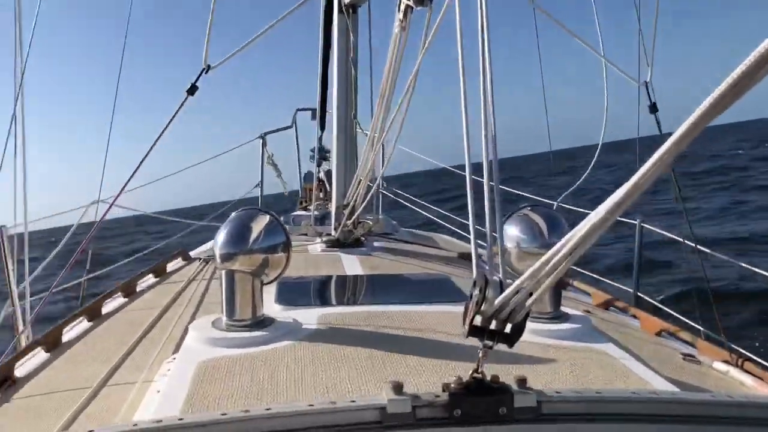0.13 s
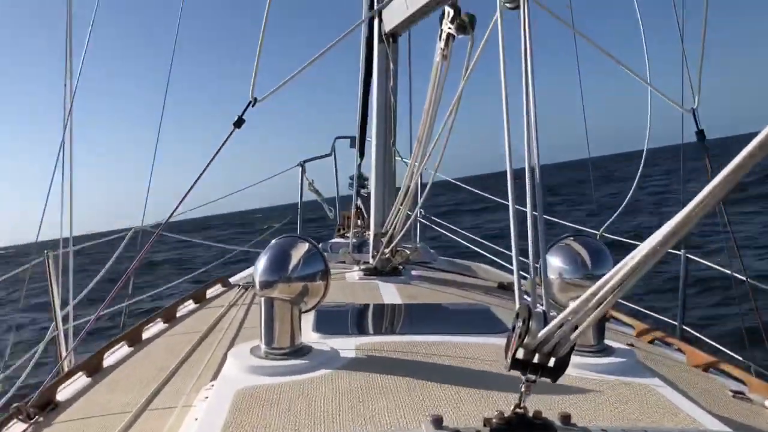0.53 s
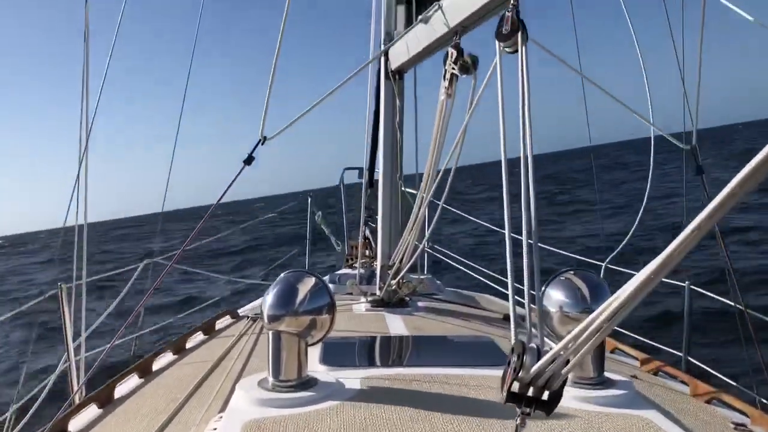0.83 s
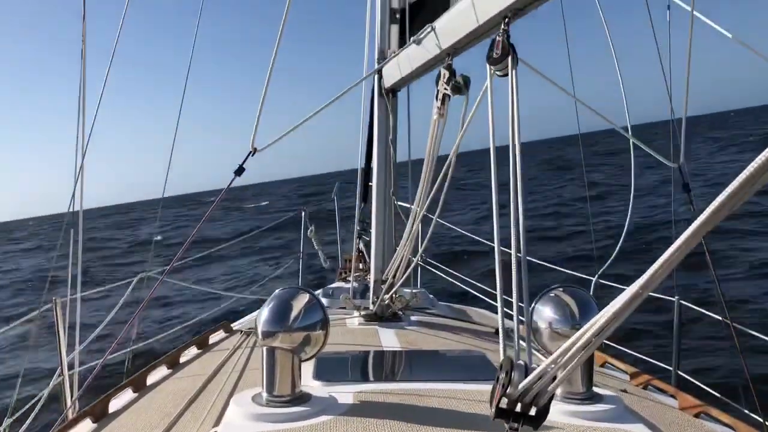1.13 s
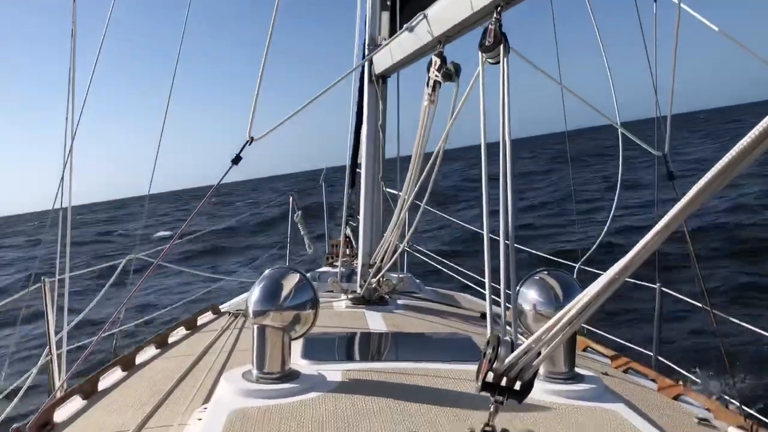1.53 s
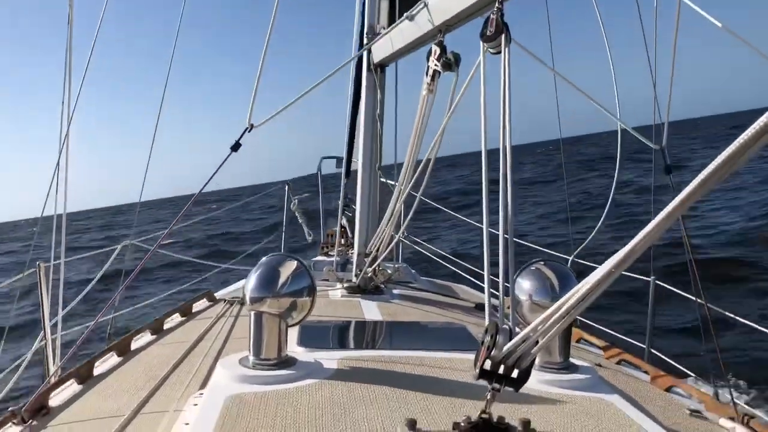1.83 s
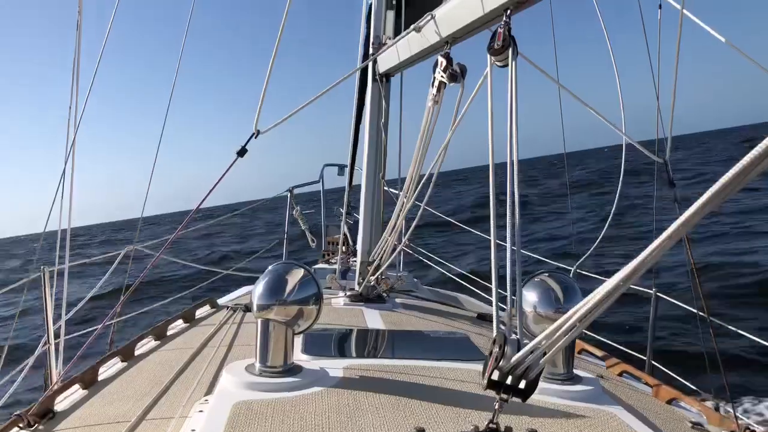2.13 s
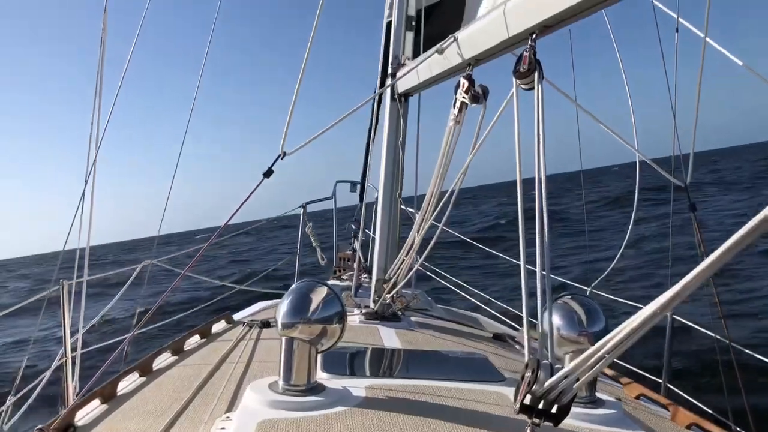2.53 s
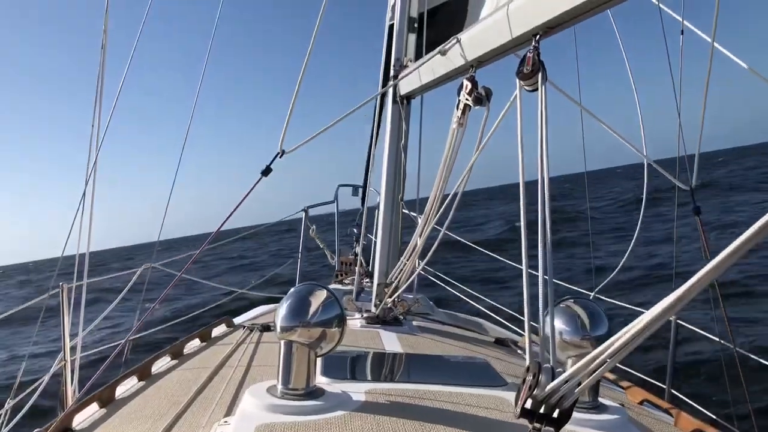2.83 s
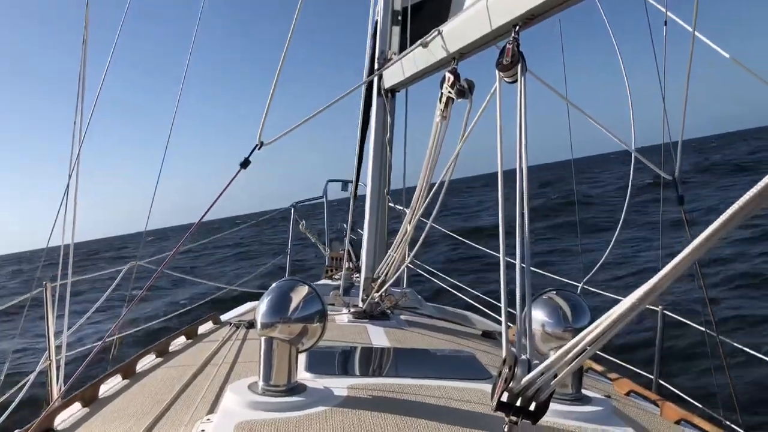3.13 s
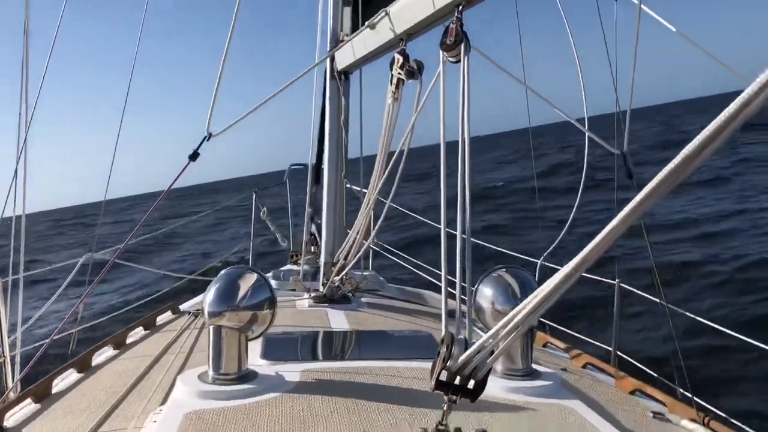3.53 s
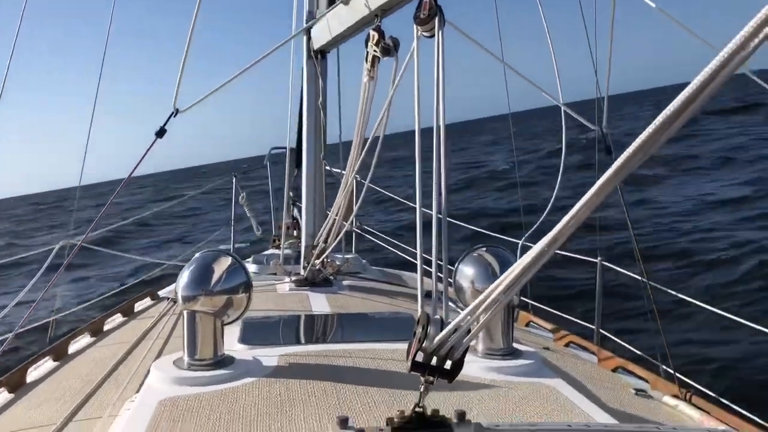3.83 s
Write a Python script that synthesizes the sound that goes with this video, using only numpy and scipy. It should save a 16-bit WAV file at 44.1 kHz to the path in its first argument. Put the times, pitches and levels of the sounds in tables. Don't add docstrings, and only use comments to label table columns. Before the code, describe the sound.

Wind on an exposed microphone aboard a sailboat: a low, uneven rumble for the first 2.7 seconds. Beneath it, water hisses faintly along the hull with soft slaps; spray fizzes around 0.3 and 0.6 seconds with tiny drop ticks. A block knocks lightly near 1.85. At 2.7 a gust hits, booming, then from 3.2 turning brighter, crackling and popping, squashed at full loudness until the abrupt end at 4.

```python
import sys
import numpy as np
from scipy import signal
from scipy.fft import rfft, irfft
from scipy.io import wavfile
from scipy.ndimage import uniform_filter1d, minimum_filter1d

SR = 44100
rng = np.random.default_rng(int(sys.argv[2]) if len(sys.argv) > 2 else 0)


def gain_from_decibels(decibels):
    exponent = np.asarray(decibels, float) / 20
    return 10 ** exponent


def pcm_store(signal):
    levels = np.round(np.clip(np.atleast_2d(signal), -1, 1) * 32767)
    wavfile.write(sys.argv[1], SR, levels.astype(np.int16).T)


N = 176400

# (time [s], strength [dB], swirl reach [octaves above REACH_HZ])
WIND_COURSE = [(0.0, -31, 0.15), (0.99, -27, 0.22), (1.21, -33, 0.56), (1.24, -28, 0.13), (1.8, -32, 0.22),
               (1.84, -24, 0.45), (2.14, -25, 0.17), (2.24, -29, 0.33), (2.72, -26.5, 0.17),
               (2.74, -14.5, 0.19), (2.99, -21, 0.17), (3.03, -12.5, 0.27), (3.15, -13.5, 0.69),
               (3.17, -18.5, 0.94), (3.31, -12, 1), (3.61, -14, 0.75), (3.64, -17.5, 0.96),
               (4.0, -13, 0.89)]
# (centre [s], strength [dB], half length [s])
EDDY_BURSTS = [(2.755, -33, 0.0054), (2.826, -32.5, 0.0045), (2.889, -34, 0.018), (2.998, -32, 0.0073),
               (3.022, -38, 0.0043), (3.03, -34, 0.0047), (3.065, -21.5, 0.0034), (3.097, -42, 0.0021),
               (3.214, -13, 0.0022), (3.262, -19, 0.0042), (3.287, -25, 0.0086), (3.318, -17.5, 0.014),
               (3.351, -23, 0.0017), (3.377, -14, 0.0048), (3.395, -39, 0.0077), (3.408, -13.5, 0.011),
               (3.432, 0, 0.0014), (3.447, -4, 0.0073), (3.461, -9.5, 0.018), (3.425, -10.5, 0.0023),
               (3.477, -10, .002), (3.668, -20, 0.0065), (3.279, -26, 0.0034), (3.478, -24, 0.0057),
               (3.493, -13, 0.014), (3.55, -9.5, 0.014), (3.58, -5.5, 0.015), (3.606, -14.5, 0.0057),
               (3.657, -20.5, 0.033), (3.787, -11.5, 0.012), (3.821, -15.5, 0.009), (3.878, -9.5, 0.0054),
               (3.888, -14.5, 0.034), (3.955, -20.5, 0.0045), (3.974, -13.5, 0.0099)]
# (centre [s], change [dB], half length [s])
RUMBLE_HEAVES = [(.29, 5, 0.014), (0.392, 6.5, 0.014), (1.1, -1.5, 0.028), (1.295, -5.5, 0.013),
                 (1.34, 3, 0.024), (1.583, 2, 0.022), (2.054, 3.5, 0.023), (2.43, -3.5, 0.011),
                 (2.463, 3.5, 0.027), (3.576, -1, .015), (3.313, -4, .012), (3.135, 2.5, 0.014),
                 (3.49, 0, .015), (2.8, -4.5, 0.018), (2.896, 1.5, 0.015), (3.385, -1.5, 0.0047),
                 (3.455, -1, 0.019), (3.75, -3.5, 0.024), (3.794, 1, 0.015), (3.896, -5, .03),
                 (3.94, 0.5, 0.017)]
# (time [s], hiss level [dB], extra body [dB])
SEA_COURSE = [(0.0, -63, 0.5), (0.17, -66.5, -0.5), (0.29, -58, -5), (0.47, -59, -4.5), (0.61, -60.5, -4),
              (0.67, -61, 3), (1.15, -59, 2.3), (1.26, -54.5, -1.5), (1.88, -64, 3.5), (2.64, -65.5, 1.9),
              (2.718, -66, 2), (2.726, -63, 3), (2.97, -59, -5), (3.05, -60.5, 4), (3.31, -61, 2),
              (3.35, -58, 6.5), (3.98, -57, 6.5), (4.0, -56, 12)]
# (frequency [Hz], density [dB per Hz])
FOAM_SPECTRUM = [(500, 4.5), (1500, 1), (3000, -4.5), (5400, -9), (8000, -12.5), (11500, -17.5),
                 (15500, -25.5)]
# (frequency [Hz], density [dB per Hz])
RUSH_SPECTRUM = [(200, -12), (500, 1.5), (900, 6), (1500, -4), (3000, -35), (6000, -64)]
# (frequency [Hz], density [dB per Hz])
RIGGING_SPECTRUM = [(2000, 12), (5000, -19), (10000, -16), (15500, 1)]
# (centre [s], level [dB], pitch [Hz], half length [s])
HULL_SLAPS = [(.057, -39, 830, 0.014), (.187, -39, 740, 0.019), (1.862, -44, 1600, 0.0054),
              (2.008, -44, 1200, 0.013), (2.028, -37, 450, 0.019), (2, -50, 2400, .003),
              (.83, -43.5, 920, 0.046), (.592, -42, 2600, 0.003), (3.03, -17, 220, 0.011),
              (2.46, -28, 135, 0.028), (1.345, -41, 320, .04), (3.99, -15, 380, 0.0071)]
# (centre [s], half length [s], level [dB])
SPRAY_SHEETS = [
    (0.293, 0.073, -45.5),
    (0.592, 0.051, -51.5),
    (0.368, 0.042, -49.5),
    (0.303, .015, -50.5),
    (.46, .04, -61),
    (3.955, 0.03, -52),
    (3.1, .012, -53),
    (0.61, 0.0074, -54),
    (.71, 0.0093, -66),
    (3.9, .012, -56),
]
# (frequency [Hz], density [dB per Hz])
FIZZ_SPECTRUM = [(880, -20), (1500, -12), (2420, 0), (3120, -4.5), (6250, -8), (6890, -11), (15500, -13.5)]
# (time [s], level [dB], pitch [Hz])
DECK_DROPS = [(0.1331, -36, 7070), (0.2329, -33, 7490), (0.5043, -34, 8380), (0.5424, -40, 12000),
              (0.5675, -35, 11000), (0.606, -31, 8500), (0.6305, -33, 6160), (0.673, -35, 5720),
              (1.3894, -44, 13000), (1.713, -44, 12000), (1.8594, -46, 9000), (0.2081, -42, 6350),
              (0.2615, -40, 5000), (0.3545, -32, 9000), (0.584, -42, 11000), (2.1834, -40, 9600),
              (3.395, -33, 8000)]
# (frequency [Hz], level [dB], t60 [s])
DECK_MODES = [(620, 1, 0.018), (950, 1, 0.036), (1300, -2, 0.018), (1630, -1, 0.018), (2130, -4.5, 0.027),
              (2670, -11, .014)]
# (time [s], peak [dB], pitch [Hz])
PRESSURE_POPS = [(2.756, -26, 420), (2.819, -28, 450), (2.826, -17.5, 397), (2.866, -26, 500),
                 (2.996, -14.5, 407), (3.018, -18.5, 650), (3.029, -7.5, 377), (3.065, -10.5, 650),
                 (3.102, -13, 706), (3.212, -15.5, 950), (3.255, -19, 810), (3.269, -14, 750),
                 (3.292, -13, 800), (3.329, -6.5, 800), (3.378, -2.5, 920), (3.399, -8.5, 890),
                 (3.419, -11, 1540), (3.432, -2, 1510), (3.475, -14, 1250), (3.5, -8.5, 1020),
                 (3.549, -5, 900), (3.578, -8.5, 1880), (3.62, -8, 600), (3.784, -8, 800),
                 (3.792, -14, 690), (3.821, -9, 500), (3.883, -12.5, 1220), (3.897, -4, 696),
                 (3.9726, -13, 1100), (3.981, -8, 1230), (3.281, -14, 806), (3.4235, -12.5, 1900),
                 (3.315, -12, 900), (3.322, -13.5, 1100), (3.375, -14, 1380), (3.444, -8, 1300),
                 (3.448, -14, 1400), (3.459, -11, 1200), (3.57, 0, 1200), (3.582, -9, 1500),
                 (3.717, -18.5, 694), (3.751, -17, 690), (3.909, -16, 990), (3.966, -11, 700),
                 (3.975, -12, 800), (3.99, -24, 500), (2.728, -31, 450), (2.892, -15.5, 546),
                 (3.229, -16, 600), (3.366, -12, 800), (3.4974, -15, 1500), (3.524, -19, 1000),
                 (3.852, -12, 600), (3.954, -17, 900), (3.8834, -24, 2200), (3.4745, -27, 1900)]

REACH_HZ, FALL_DB, FALL_POWER, TILT_DB_PER_OCT = 176.7, 9, 1.324, 0.16
EDDY_QUIET_DB, EDDY_DB_PER_OCT, EDDY_PUSH_DB = -47.5, 17.5, 5.5
LUMP_DB, LUMP_OCT, LUMP_HZ, BAND_WOBBLE_DB = 2.0, 0.073, 60, 1.8
SURGE_DB, SURGE_HZ = 0.82, 3.8
CRACKLE_OCT, CRACKLE_HZ = 0.048, 160
THIN_DB_PER_OCT = 4
STEADINESS, CAPSULE_TOP_HZ = 0.075, 2570
LOW_CUT_HZ, RUMBLE_CUT_HZ, EDGE_HZ = 53, 33, 15720
FOAM_DB, RUSH_DB, RIGGING_DB = 13, 13, -63
GUST_ONSET_S, GUST_HISS_DB = 2.723, 2
SLAP_WIDTH_OCT = 0.84
DROP_WIDTH_OCT, DROP_RISE_S, DROP_DB = 0.8, 0.0006, -3.5
KNOCK_S, KNOCK_DB, REBOUND_S, REBOUND_DB = 1.8424, -32, 0.00264, 8.5
POP_OCTAVE_BELOW, POP_HALF_CYCLES = 0.72, 0.72
CEILING = 0.92


def evened(x):
    return x / np.sqrt(np.mean(x ** 2) + 1e-20)


def read(points, hz):
    f, value = np.transpose(points)
    return np.interp(np.log(hz + 1), np.log(f + 1), value)


def course(table, t):
    at, first, second = np.transpose(table)
    return np.interp(t, at, first), np.interp(t, at, second)


def bell(t, at, half_s):
    return np.exp(-0.5 * ((t - at) / half_s) ** 2)


def drift(top_hz, count=1):
    hz = np.fft.rfftfreq(N, 1 / SR)
    z = rfft(rng.standard_normal((count, N))) * (hz > 2) / (1 + (hz / top_hz) ** 2)
    return evened(irfft(z, N))


def pitched_noise(count, pitch_hz, width_oct):
    octaves = np.log2((np.fft.rfftfreq(count, 1 / SR) + 1) / pitch_hz)
    return evened(irfft(rfft(rng.standard_normal(count)) * np.exp(-(octaves / width_oct) ** 2)))


def patchy(spectrum, patchy_db, flicker_db):
    frames, hz = N // 128 + 5, np.fft.rfftfreq(512, 1 / SR)
    a, b, patches = rng.standard_normal((frames, 257, 3)).T
    patches = uniform_filter1d(patches, size=9, axis=0)
    patches = evened(uniform_filter1d(patches, size=16, axis=1))
    flicker = evened(uniform_filter1d(rng.standard_normal(frames), size=5))
    lows = np.minimum(hz / spectrum[0][0], 1) ** 2
    level_db = read(spectrum, hz)[:, None] + patchy_db * patches + flicker_db * flicker
    z = (a + 1j * b) * lows[:, None] * gain_from_decibels(level_db)
    return evened(signal.istft(z, nperseg=512, noverlap=384)[1][:N])


def wind():
    t, hz = np.arange(N) / SR, np.fft.rfftfreq(N, 1 / SR)
    level_db, reach_oct = course(WIND_COURSE, t)
    burst = np.zeros(N)
    for at, db, half_s in EDDY_BURSTS:
        peak = 2 ** ((db - EDDY_QUIET_DB) / EDDY_DB_PER_OCT)
        burst += (peak * bell(t, at, half_s)) ** 4
    lumps = drift(LUMP_HZ, count=2)
    reach_hz = REACH_HZ * (16 ** reach_oct + burst) ** (1 / 4) * 2 ** (LUMP_OCT * lumps[0])
    level_db = level_db + LUMP_DB * (lumps[0] + lumps[1]) / 2
    level_db += EDDY_PUSH_DB * np.log2(1 + burst / 16 ** reach_oct) / 4
    level_db += SURGE_DB * drift(SURGE_HZ)[0]
    for at, db, half_s in RUMBLE_HEAVES:
        level_db += db * bell(t, at, half_s)
    reach_hz = reach_hz * (reach_hz / REACH_HZ) ** (CRACKLE_OCT * drift(CRACKLE_HZ)[0])

    centres_hz = 30 * np.sqrt(2) ** np.arange(16)
    wobbles = drift(LUMP_HZ / 2, count=16)
    noise = rfft(rng.standard_normal(N))
    out = np.zeros(N)
    for c, wobble in zip(centres_hz, wobbles):
        band = np.cos(np.pi / 2 * np.clip(2 * np.log2((hz + 1) / c), -1, 1))
        swirl = evened(irfft(noise * band, N))
        power = abs(uniform_filter1d(swirl ** 2, size=int(2 * SR / c)))
        swirl /= (power + 1 / 20) ** (STEADINESS / 2)
        band_db = TILT_DB_PER_OCT * np.log2(c / REACH_HZ) - FALL_DB * (c / reach_hz) ** FALL_POWER
        band_db += BAND_WOBBLE_DB * wobble - 10 * np.log10(1 + (c / CAPSULE_TOP_HZ) ** 4)
        band_db += 0.5 - THIN_DB_PER_OCT * np.log2(1 + reach_hz / c)
        out += evened(swirl) * gain_from_decibels(level_db + band_db)
    return signal.sosfilt(signal.butter(4, LOW_CUT_HZ, "high", fs=SR, output="sos"), out)


def gust_onset():
    return np.clip((np.arange(N) / SR - GUST_ONSET_S) * 100, 0, 1)


def sea():
    level_db, body_db = course(SEA_COURSE, np.arange(N) / SR)
    foam = patchy(FOAM_SPECTRUM, patchy_db=0.5, flicker_db=1.0)
    foam = foam * gain_from_decibels(FOAM_DB + GUST_HISS_DB / 2 * gust_onset())
    rush = gain_from_decibels(RUSH_DB + body_db) * patchy(RUSH_SPECTRUM, patchy_db=1.7, flicker_db=1.0)
    return gain_from_decibels(level_db) * (foam + rush)


def rigging():
    hiss = patchy(RIGGING_SPECTRUM, patchy_db=-0.5, flicker_db=1.5)
    return gain_from_decibels(RIGGING_DB + GUST_HISS_DB * gust_onset()) * hiss


def slaps():
    out, u = np.zeros(N + 4096), np.arange(-2048, 2048) / SR
    for at, db, pitch_hz, half_s in HULL_SLAPS:
        puff = pitched_noise(4096, pitch_hz, SLAP_WIDTH_OCT)
        out[round(at * SR) - 2048:][:4096] += gain_from_decibels(db) * puff * np.exp(-(u / half_s) ** 2)
    return out[:N]


def spray():
    t, u = np.arange(N) / SR, np.arange(300) / SR
    swell = sum(gain_from_decibels(db) * np.exp(-((t - at) / half_s) ** 2) for at, half_s, db in SPRAY_SHEETS)
    out = swell * patchy(FIZZ_SPECTRUM, patchy_db=-1.0, flicker_db=3.3)
    shape = (u / DROP_RISE_S) * np.exp(-u / DROP_RISE_S)
    for at, db, pitch_hz in DECK_DROPS:
        tick = pitched_noise(300, pitch_hz, DROP_WIDTH_OCT)
        out[round(at * SR):][:300] += gain_from_decibels(db + DROP_DB) * shape * tick
    return out


def knocks():
    out, u = np.zeros(N), np.arange(3000) / SR
    ring = sum(gain_from_decibels(db - 60 * u / t60_s) * np.sin(2 * np.pi * hz * u) for hz, db, t60_s in DECK_MODES)
    ring = ring * (1 - np.exp(-(u / 0.00041) ** 2))
    for at, db in [(KNOCK_S, KNOCK_DB), (KNOCK_S + REBOUND_S, KNOCK_DB + REBOUND_DB)]:
        out[round(at * SR):][:3000] += gain_from_decibels(db) * ring
    return out


def pops():
    out, u = np.zeros(N + 800), np.arange(-400, 400) / SR
    for (at, db, hz), phase in zip(PRESSURE_POPS, rng.random(len(PRESSURE_POPS))):
        flick = np.cos(2 * np.pi * (hz * u + phase))
        flick += POP_OCTAVE_BELOW * np.cos(2 * np.pi * (hz * u / 2 + phase))
        flick *= (1 + (u * hz / POP_HALF_CYCLES) ** 2) ** -2.6 * np.hanning(800)
        out[round(at * SR) - 400:][:800] += gain_from_decibels(db) * (flick - flick.mean())
    return out[:N]


def scene():
    return (wind() + sea() + rigging() + slaps() + spray() + knocks() + pops())[None]


def low_pass(x):
    return signal.sosfilt(signal.butter(12, 16830, fs=SR, output="sos"), x)


def record(dry):
    room = minimum_filter1d(np.minimum(CEILING / (abs(dry) + 1e-9), 1), size=97, axis=1)
    gain = uniform_filter1d(room, size=49, axis=1)
    treble = signal.sosfiltfilt(signal.butter(4, 5000, "high", fs=SR, output="sos"), dry)
    held = (dry - treble) * gain + treble
    hz = np.fft.rfftfreq(2 * N, 1 / SR)
    response = (hz < EDGE_HZ) / np.sqrt(1 + (RUMBLE_CUT_HZ / (hz + 1)) ** 8)
    mirrored = np.hstack([held, held[:, ::-1]])
    held = irfft(rfft(mirrored) * response)[:, :N]
    fade = np.sin(np.pi / 2 * np.minimum(np.arange(N)[::-1] / 150, 1)) ** 2
    return low_pass(held * fade)


dry = scene()
out = record(dry)
pcm_store(out)
```